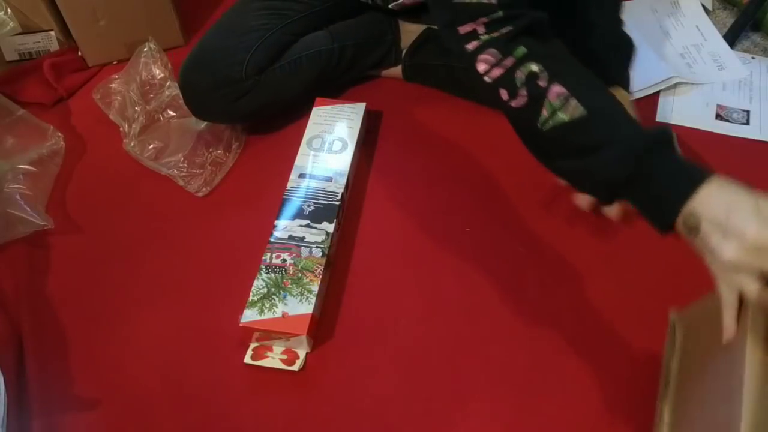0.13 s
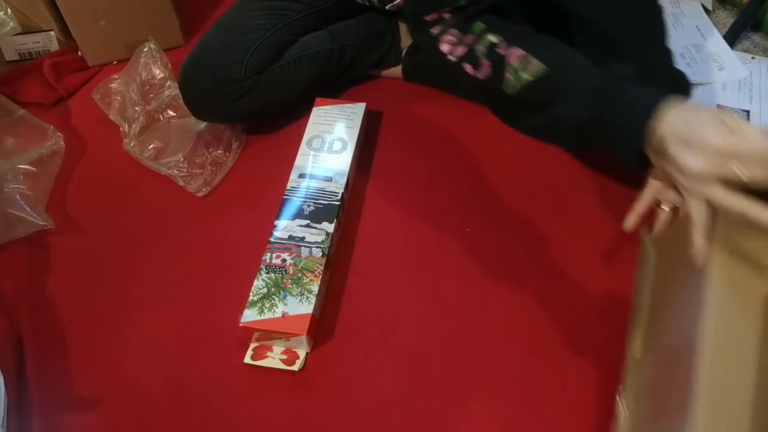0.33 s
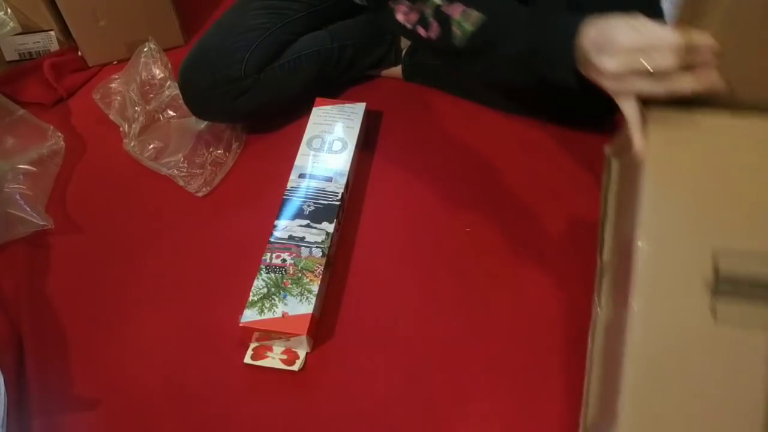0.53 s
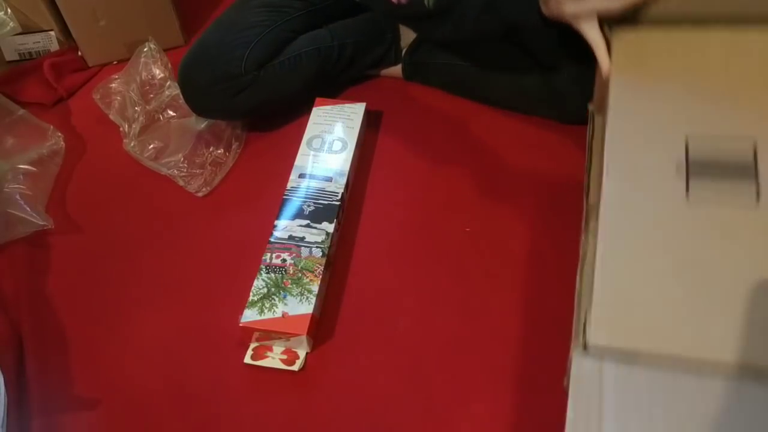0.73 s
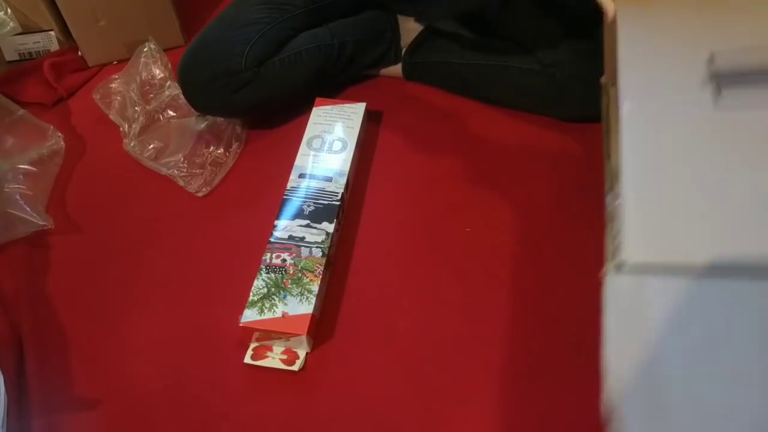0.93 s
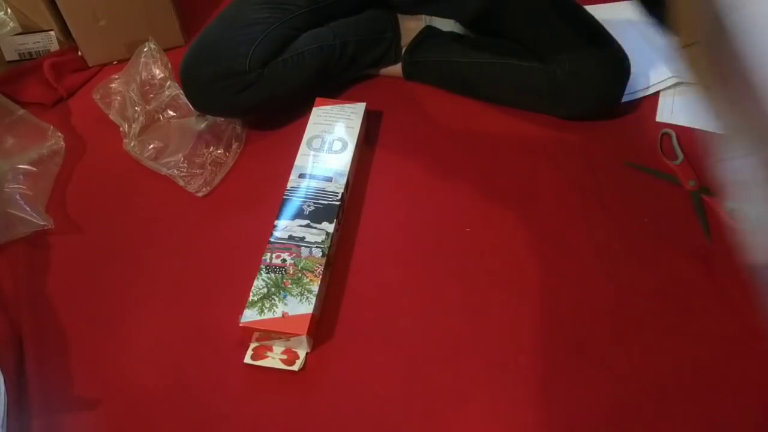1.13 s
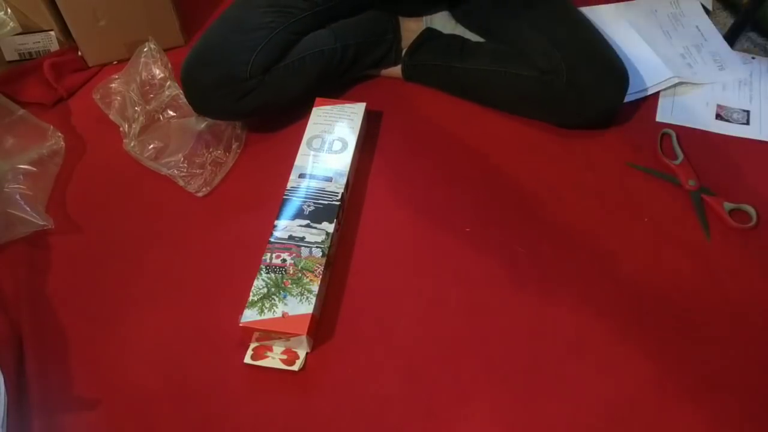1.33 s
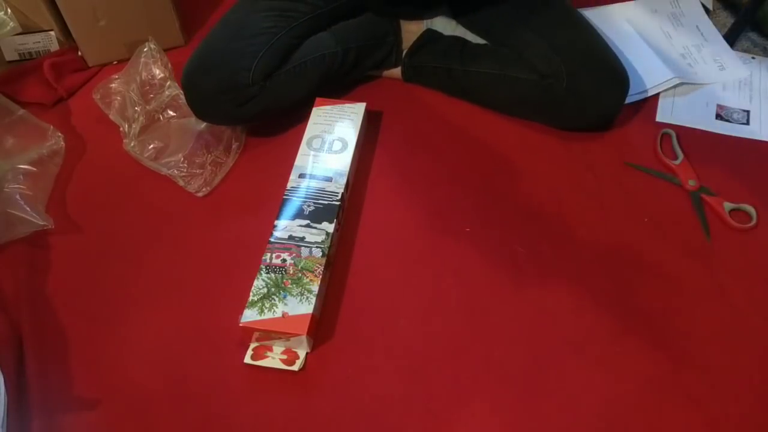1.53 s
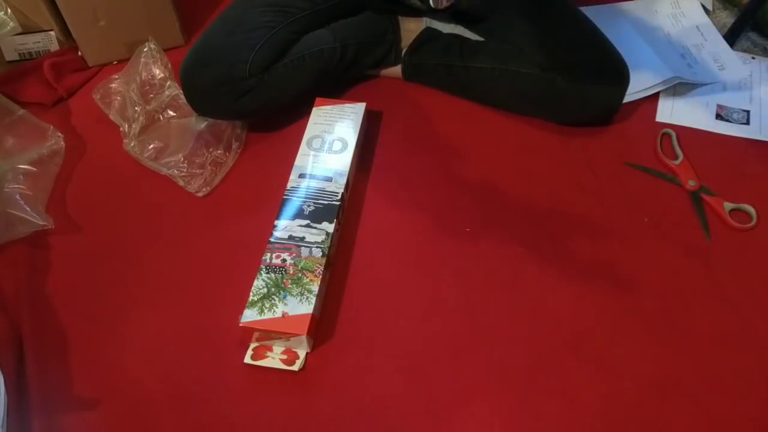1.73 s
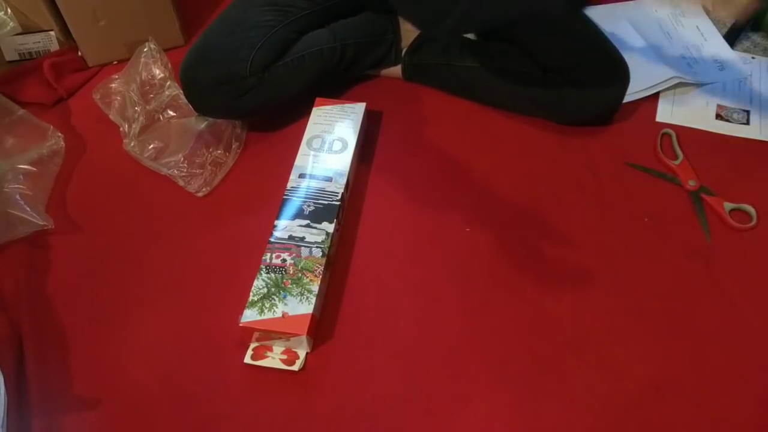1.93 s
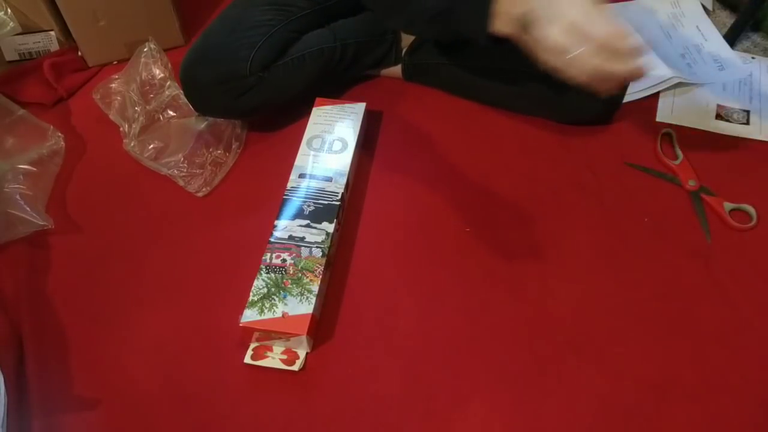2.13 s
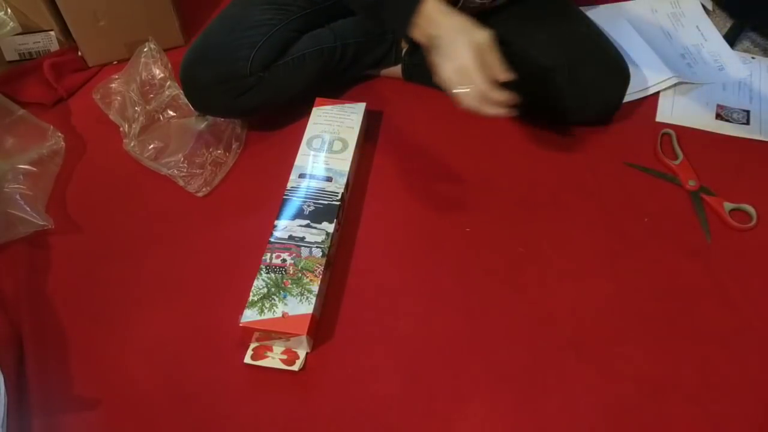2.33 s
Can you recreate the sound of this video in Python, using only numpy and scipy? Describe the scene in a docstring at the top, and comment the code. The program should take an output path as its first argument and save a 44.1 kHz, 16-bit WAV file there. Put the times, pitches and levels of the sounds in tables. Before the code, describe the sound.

Cardboard boxes being handled indoors: scraping, a hollow knock, near quiet, then a loud clattering tumble

```python
"""Cardboard boxes knock and tumble on a carpet close to a small microphone: each blow rings damped wall modes,
with a noisy rattle, a snap, a crunch and a boom of the air inside. Between the blows, card slides: grainy noise
hisses, buzzes a panel and rumbles. Light taps ring that panel, and bright noise bursts are ticks of plastic or
paper. Blows and taps reverberate over faint air noise and hum; the loudest blow clips."""
import sys
import numpy as np
from scipy import signal
from scipy.fft import rfft, irfft, next_fast_len
from scipy.io import wavfile
from scipy.ndimage import uniform_filter1d

SR = 44100
rng = np.random.default_rng(int(sys.argv[2]) if len(sys.argv) > 2 else 0)


def bounce(signal):
    """Save signal as a 16-bit WAV file at the path given by the first command-line argument."""
    frames = np.transpose(np.atleast_2d(signal))
    limited = np.clip(frames, -1, 1)
    pcm = np.round(limited * 32767).astype(np.int16)
    wavfile.write(sys.argv[1], SR, pcm)


N = 105751  # length in samples
RATTLE_DB = -18  # starting level of contact noise, against a one-sample contact of 0 dB


def amp(db):
    """Decibels to linear gain."""
    return 10 ** (np.asarray(db) / 20)


def unit(x):
    """Scale to an RMS of one."""
    return x / np.sqrt(np.mean(x ** 2) + 1e-20)


def along(points, hz):
    """Interpolate (Hz, value) points on a log frequency axis."""
    point_hz, value = np.transpose(points)
    return np.interp(np.log(hz + 1), np.log(point_hz + 1), value)


def filtered(x, response):
    """Shape the spectrum by a response given as a function of frequency."""
    size = next_fast_len(len(x) + SR // 4)  # room for the ringing
    spectrum = rfft(x, size) * response(np.fft.rfftfreq(size, 1 / SR))
    return irfft(spectrum, size)[:len(x)]


def peak(f, hz, width):
    """Complex response of one resonance, of unit gain at its centre."""
    return 1j * f * width / (hz * hz - f * f + 1j * f * width)


def patchy(patchy_db):
    """White noise whose gain varies in smooth random patches of time and frequency."""
    z = signal.stft(rng.standard_normal(N), nperseg=512)[2]
    field = uniform_filter1d(rng.standard_normal(z.shape), 6, 0)
    field = uniform_filter1d(field, 6, 1)
    return signal.istft(z * amp(patchy_db * unit(field)), nperseg=512)[1][:N]


def add(x, s, sound):
    """Mix a sound in at a time in seconds."""
    part = x[max(round(s * SR), 0):][:len(sound)]
    part += sound[:len(part)]


def room_tone():
    """Steady air is shaped noise; the unsteady low hum is noise through a narrow resonance."""
    # Spectrum of the air. Each row: frequency in Hz, relative density in dB.
    air_spectrum = [(15, -30), (30, -18), (60, 8), (110, -0.5), (400, 4.5), (650, -0.5), (1000, -9.5),
                    (2800, -11), (8000, -64), (16000, -10)]
    air_db, hum_db = -55.5, -60.5  # RMS
    hum_hz, hum_width_hz = 120, 20  # each of two passes
    air = filtered(patchy(patchy_db=-0.5), lambda f: amp(along(air_spectrum, f)))
    hum = filtered(rng.standard_normal(N), lambda f: peak(f, hum_hz, hum_width_hz) ** 2)
    return amp(air_db) * unit(air) + amp(hum_db) * unit(hum)


def ticks():
    """Ticks and scuffs of plastic or paper are decaying noise bursts through a broad treble resonance."""
    # Each row: start in seconds, level before the filter in dB, decay by 60 dB in seconds.
    tick_rows = [(0.027, -32, 0.022), (0.118, -31, 0.025), (0.867, -48, .05), (1.149, -61, .02),
                 (1.194, -49, 0.023), (1.249, -39.5, 0.013), (1.351, -48, .02), (1.62, -54, .03),
                 (1.672, -37.5, 0.078), (1.726, -22.5, 0.32), (1.743, -22.5, 0.046), (2.298, -50, .04)]
    tick_hz, tick_width_hz = 7400, 6500  # each of two passes
    out, t = np.zeros(N), np.arange(SR // 4) / SR
    for s, db, t60 in tick_rows:
        add(out, s, amp(db - 60 * t / t60) * rng.standard_normal(len(t)))
    return filtered(out, lambda f: peak(f, tick_hz, tick_width_hz) ** 2)


def panel_ring(x):
    """The rubbed panel answers through parallel resonances of alternating sign."""
    # Each row: frequency in Hz, width in Hz, gain in dB.
    resonances = [(960, 120, -10), (1241, 55, 8), (1705, 100, -4), (2004, 80, -2), (2404, 150, -8),
                  (3150, 200, -8), (3700, 120, -8)]

    def response(f):
        """Sum of the panel's resonances."""
        return sum((-1) ** k * amp(db) * peak(f, hz, width) for k, (hz, width, db) in enumerate(resonances))

    return filtered(x, response)


def rubbing():
    """Fibres catch in small grains, sparse random impulses, on smooth patchy friction."""
    grains_per_s, grain_db, grain_spread_db = 1200, -5, 3
    caught = rng.random(N) < grains_per_s / SR
    strength = amp(grain_spread_db * rng.standard_normal(N))
    grains = caught * strength * rng.standard_normal(N)
    return patchy(patchy_db=1.5) + amp(grain_db) * unit(grains)


def sliding():
    """Card sliding on card and cloth hisses, buzzes a panel and rumbles the walls."""
    # The moving levels. Each row: time in seconds, hiss in dB, panel buzz in dB, rumble in dB.
    slide_levels = [(0, -45.5, -62, -39), (.07, -49, -46, -40.5), (.11, -44.5, -87, -45),
                    (.16, -39.5, -58, -45), (.22, -40, -47.5, -43.5), (.275, -37, -45.5, -43.5),
                    (0.303, -33.5, -35.5, -35), (.335, -39.5, -42, -42.5), (.37, -40, -57, -43),
                    (.43, -40.5, -56, -48.5), (.48, -38, -43, -48), (.53, -36.5, -51, -44),
                    (0.553, -42, -64, -44.5), (0.598, -38, -55, -35), (.69, -57.5, -58.5, -62),
                    (.88, -58.5, -67, -60), (.95, -66.5, -84, -68.5), (1.2, -58, -61, -59.5),
                    (1.309, -57, -69, -60), (1.409, -42, -79, -49), (1.472, -39, -49.5, -39.5),
                    (1.55, -45.5, -49, -55.5), (1.65, -48, -70, -58.5), (1.712, -49.5, -37, -49.5),
                    (1.778, -34.5, -50, -20), (1.868, -36.5, -43, -46), (1.948, -32.5, -33, -37.5),
                    (2.04, -39.5, -45, -44), (2.1, -34, -44, -36), (2.13, -44.5, -41, -41.5),
                    (2.211, -54.5, -57, -50.5), (2.4, -63, -83, -66)]
    # Spectrum of the hiss. Each row: frequency in Hz, gain in dB.
    hiss_spectrum = [(900, -30), (1500, -4), (2300, -5), (4500, -6), (8000, -9), (12000, -15), (16000, -25)]
    # Spectrum of the rumble. Each row: frequency in Hz, relative density in dB.
    rumble_spectrum = [(24, -60), (40, -10), (97, -9.5), (348, -8.5), (511, -11.5), (598, -10.5),
                       (740, -7.5), (1200, -10.5), (1560, -100), (2640, -120)]
    s, *levels = np.transpose(slide_levels)
    hiss_db, panel_db, rumble_db = [np.interp(np.arange(N) / SR, s, level) for level in levels]
    hiss = filtered(rubbing(), lambda f: amp(along(hiss_spectrum, f)))
    buzz = panel_ring(rubbing())
    rumble = filtered(patchy(patchy_db=-3.5), lambda f: amp(along(rumble_spectrum, f)))
    return amp(hiss_db) * unit(hiss) + amp(panel_db) * unit(buzz) + amp(rumble_db) * unit(rumble)


def taps():
    """Light taps, each a softened contact and a short scratch, ring the panel."""
    # Each row: start in seconds, level before softening and panel in dB.
    tap_rows = [(0.118, 0), (0.161, 1), (0.302, 13.5), (0.475, -8), (1.768, 14), (2.066, 2)]
    scratch_t60, soft_hz = 0.04, 2200  # seconds; corner of the two-pole softening
    out, t = np.zeros(N), np.arange(SR // 20) / SR
    for s, db in tap_rows:
        scratch = amp(RATTLE_DB - 60 * t / scratch_t60) * rng.standard_normal(len(t))
        add(out, s, amp(db) * ((t == 0) + scratch))
    return panel_ring(filtered(out, lambda f: (soft_hz / (soft_hz + 1j * f)) ** 2))


def wall_ring(modes, tilt_db, t):
    """Struck walls ring in damped sines, slightly detuned and rescaled at each blow."""
    tilt_hz, scatter_db, rise_s = 400, 1.5, .0004  # the tilt pivots at tilt_hz
    most_cycles, most_t60 = 42, .11  # card damps its ring: caps in cycles and seconds
    hz, level_db, t60 = np.transpose(modes)[:, :, None]
    t60 = np.minimum(t60, np.minimum(most_cycles / hz, most_t60))
    sign = (-1) ** np.arange(len(modes))[:, None]
    chance = rng.standard_normal((2, len(modes), 1))
    mode_db = level_db + tilt_db * np.log2(hz / tilt_hz) + scatter_db * chance[0]
    tones = np.sin(2 * np.pi * hz * (1 + 0.016 * chance[1]) * t)
    ring = (sign * amp(mode_db - 60 * t / t60) * tones).sum(0)
    return ring * (1 - np.exp(-t / rise_s))


def crunching(t):
    """Crushed card is a burst of shaped noise that rises fast and decays."""
    # Spectrum of the crunch. Each row: frequency in Hz, relative density in dB.
    crunch_spectrum = [(700, 21), (1400, 6), (2500, 4), (4000, 6), (6500, 3), (9200, -10.5), (13000, -4),
                       (16000, -32)]
    t60, rise_s = .16, .001
    noise = unit(filtered(rng.standard_normal(len(t)), lambda f: amp(along(crunch_spectrum, f))))
    return noise * amp(-60 * t / t60) * (1 - np.exp(-t / rise_s))


def knocks(events, modes):
    """Each blow and its rattle ring the walls, snap and crunch at the contact and boom the air inside."""
    snap_hz, snap_t60 = 1340, 0.002
    air_hz, air_t60, air_rise_s = 104, 0.24, 0.0038
    out, t = np.zeros(N), np.arange(SR // 2) / SR
    for s, db, tilt_db, crunch_db, boom_db, snap_db, rattle_t60 in events:
        rattle = amp(RATTLE_DB - 60 * t / rattle_t60) * rng.standard_normal(len(t))
        force = (t == 0) + rattle
        walls = signal.fftconvolve(wall_ring(modes, tilt_db, t), force)[:len(t)]
        crunch = amp(crunch_db) * crunching(t)
        snap = amp(snap_db - 60 * t / snap_t60) * np.sin(2 * np.pi * snap_hz * t)
        boom = amp(boom_db - 60 * t / air_t60) * np.sin(2 * np.pi * air_hz * t)
        boom = boom * (1 - np.exp(-t / air_rise_s))
        add(out, s, amp(db - 5.5) * walls + crunch + snap + boom)
    return out


def pile_blows():
    """Other boxes tumble and thump on the floor, ringing their own set of wall modes."""
    # Each row: start in seconds, wall level before a 5.5 dB cut in dB, tilt in dB per octave, crunch in dB,
    # boom in dB, snap in dB, rattle decay by 60 dB in seconds.
    pile_events = [(1.455, -42, 8.5, -50, -62, -41, 0.062), (1.507, -34, -1.5, -39.5, -39, -50, 0.034),
                   (1.535, -70, 4, -76, -35, -70, 0.04), (1.727, -18, -0.5, -17, -24, -14, 0.16),
                   (1.744, -33, -15, -21.5, -12.5, -40, 0.067), (1.764, -15.5, -2, -23.5, -25, -44, 0.25),
                   (1.786, -21, -4, -40, -9, -47, 0.071), (1.879, -7, 2.5, -13, -22, 11, 0.12),
                   (1.897, -11.5, -6, -19.5, -17, -34, 0.12), (1.928, -26, -3, -37, -57, -46, 0.16),
                   (1.957, -20, -2, -37, -56, -40, 0.22), (1.998, -29, -6, -30, -45, -50, .08),
                   (2.068, -34, 0, -33, -46, -47, 0.18), (2.098, -42.5, 8, -38, -54, -36.5, 0.067),
                   (2.14, -53, -4, -57, -30.5, -62, .1), (2.33, -54.5, -13, -77, -51, -59, 0.042)]
    # Wall modes. Each row: frequency before detuning in Hz, level before tilt and scatter in dB,
    # decay by 60 dB before the caps in seconds.
    pile_modes = [(150, -5.5, 0.079), (202, -4.5, 0.087), (251.5, 3, 0.044), (305, -3.5, .08),
                  (394, -3.5, 0.078), (459, -3.5, 0.076), (540, -2, 0.05), (654, -14.5, 0.064),
                  (785, -8.5, 0.04), (919, -7, 0.022), (1050, -11, 0.061), (1147, -3.5, 0.027),
                  (1340, -9.5, .04), (1400, -5.5, 0.041), (1507, -11.5, 0.044), (1660, -6, 0.025),
                  (2064, -13.5, 0.024), (2670, -10.5, 0.019)]
    return knocks(pile_events, pile_modes)


def carton_blows():
    """The dragged carton is knocked and rings its own set of wall modes."""
    # Each row: start in seconds, wall level before a 5.5 dB cut in dB, tilt in dB per octave, crunch in dB,
    # boom in dB, snap in dB, rattle decay by 60 dB in seconds.
    carton_events = [(0.001, -29, -12.5, -71, -50, -60, 0.017),
                     (0.027, -22, -0.5, -36, -31.5, -11.5, 0.068), (0.09, -36, -8, -68, -59, -60, 0.034),
                     (0.117, -56, 0, -60, -46, -23, 0.034), (0.325, -75, -4.5, -77, -35, -75, 0.02),
                     (0.569, -11.5, -2.5, -28, -29.5, -36, 0.079), (0.59, -28, -13, -47, -58, -40, 0.091)]
    # Wall modes. Each row: frequency before detuning in Hz, level before tilt and scatter in dB,
    # decay by 60 dB before the caps in seconds.
    carton_modes = [(65, -24.5, 0.17), (198, -3, 0.078), (264, -11, 0.13), (300, -4, 0.24),
                    (344, 2.5, 0.06), (410, -3, 0.076), (524, -16.5, 0.09), (742, -14.5, .08),
                    (1007, -20, .08), (1070, -18, 0.065), (1480, -8.5, 0.02), (1740, -13, 0.066)]
    return knocks(carton_events, carton_modes)


def room(x):
    """The room's walls answer with a noise tail in which each frequency dies at its own speed."""
    # Each row: frequency in Hz, decay by 60 dB in seconds.
    room_decay = [(100, 0.41), (1000, 0.33), (10000, 0.16)]
    room_db, delay_s = -14.5, .008  # the tail has unit energy before this gain
    hz, t, z = signal.stft(rng.standard_normal(SR // 2), SR, nperseg=256)
    decay = amp(-60 * t / along(room_decay, hz)[:, None])
    tail = signal.istft(z * decay, SR, nperseg=256)[1]
    delayed = np.pad(x, (round(delay_s * SR), 0))
    return amp(room_db) * signal.fftconvolve(delayed, tail / np.linalg.norm(tail))[:N]


def scene():
    """Two sets of blows, each with its own reverberation, over sliding, ticks and room tone."""
    carton = carton_blows() + taps()
    pile = pile_blows()
    blows = carton + room(carton) + pile + room(pile)
    return (blows + sliding() + ticks() + room_tone())[None]


def record(dry):
    """The microphone cuts deep bass and peaks in the treble; its input clips softly below a band limit."""
    low_hz, peak_hz, peak_width_hz, peak_db = 66, 9200, 1000, 2  # the resonance adds to the direct sound
    clip_top, clip_hard, top_hz = .76, 8, 15750  # ceiling, sharpness of its knee, band limit

    def response(f):
        """Two-pole bass cut and treble resonance."""
        bass_cut = (1j * f / (low_hz + 1j * f)) ** 2
        return bass_cut * (1 + amp(peak_db) * peak(f, peak_hz, peak_width_hz))

    mic = filtered(dry[0], response)
    clipped = mic / (1 + np.abs(mic / clip_top) ** clip_hard) ** (1 / clip_hard)
    return filtered(clipped, lambda f: f < top_hz)[None]


dry = scene()
out = record(dry)
bounce(out)
```